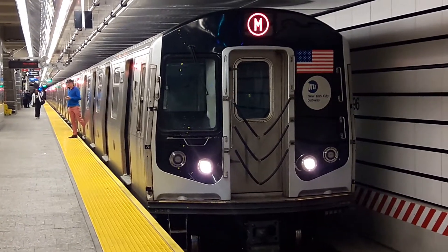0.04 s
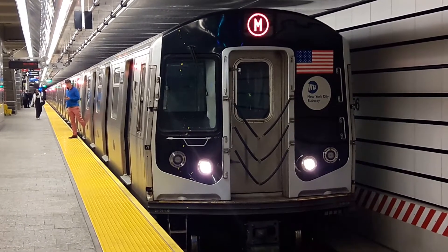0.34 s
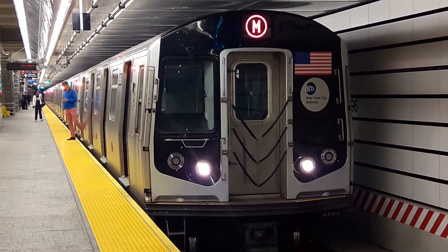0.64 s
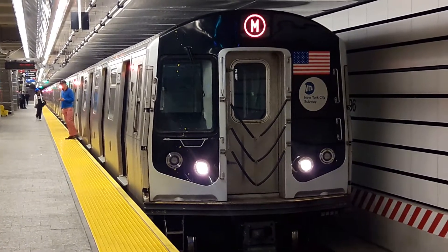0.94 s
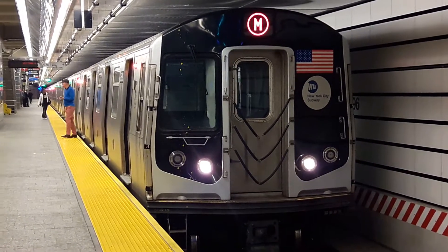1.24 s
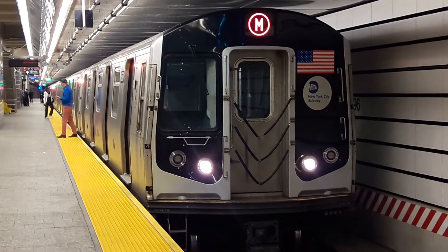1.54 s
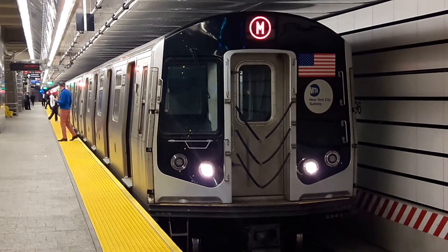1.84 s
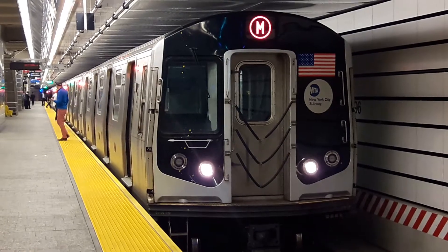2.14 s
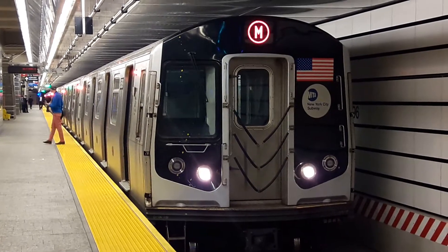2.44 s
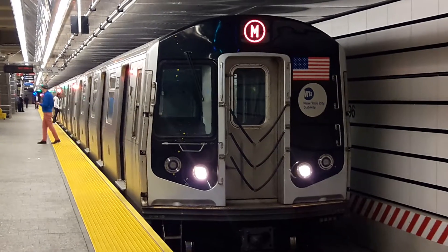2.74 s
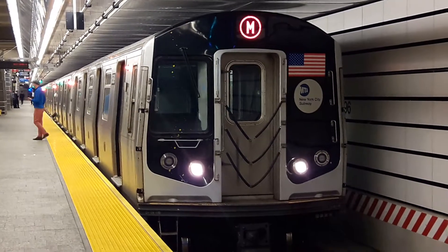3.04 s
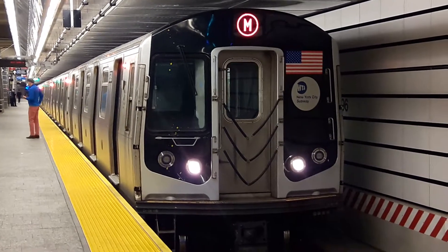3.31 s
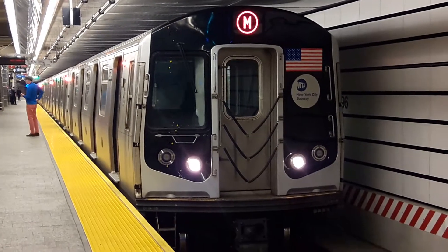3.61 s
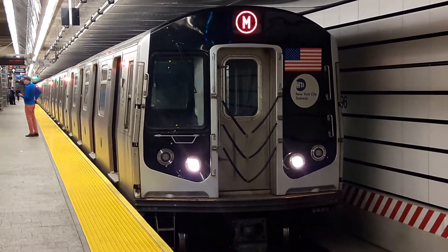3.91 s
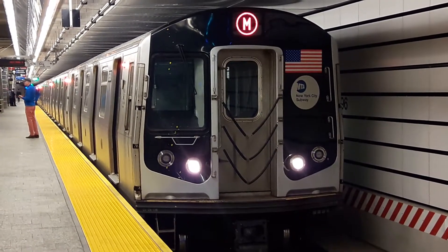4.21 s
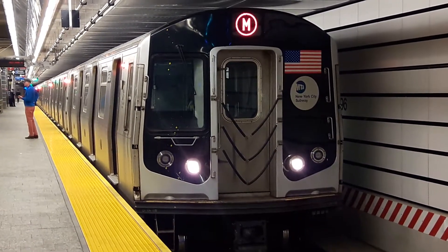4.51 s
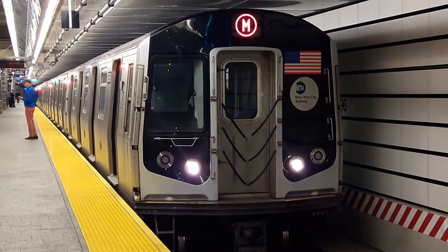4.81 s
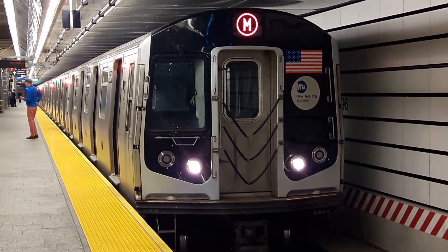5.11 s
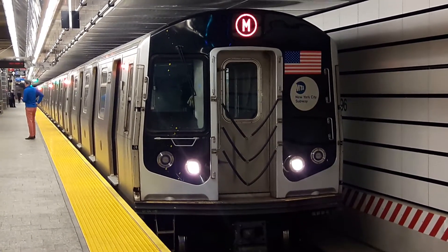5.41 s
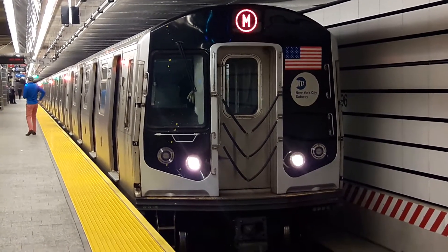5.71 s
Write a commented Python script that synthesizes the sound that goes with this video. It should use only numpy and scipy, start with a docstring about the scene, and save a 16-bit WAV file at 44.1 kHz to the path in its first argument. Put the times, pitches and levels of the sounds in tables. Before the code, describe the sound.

A subway train stands at an underground platform, its electrical equipment humming on one steady low note. The air-conditioning rushes evenly through ducts and tunnel, with faint motor tones mixed in. Right at the start a valve lets off two soft puffs of air, then a weaker one about a second later, each dying away in the station. The hum and rush carry on, heard from just ahead of the cab.

```python
"""Subway train standing at an underground platform.

Heard from just ahead of the cab. The electrical equipment hums on one steady note with a strong
octave, motors add faint tones, and the air-conditioning rushes through ducts and tunnel.
Near the start a valve lets off soft puffs of air that die away in the station."""
import sys
import numpy as np
from scipy import signal
from scipy.fft import rfft, irfft
from scipy.io import wavfile
from scipy.ndimage import uniform_filter1d

SR = 44100
rng = np.random.default_rng(int(sys.argv[2]) if len(sys.argv) > 2 else 0)


def log_audio(samples):
    """Write samples as a 16-bit WAV file to the path given in sys.argv[1]."""
    # one column per channel
    frames = np.atleast_2d(samples).T
    # limit to full scale, then quantise
    limited = np.clip(frames, -1, 1)
    pcm = np.round(limited * 32767).astype(np.int16)
    wavfile.write(sys.argv[1], SR, pcm)


N = 253898
TIME_S = np.arange(N) / SR
FREQ_HZ = np.maximum(np.arange(N // 2 + 1) * SR / N, 1)


def undb(db):
    """Decibels to gain."""
    return 10 ** (np.asarray(db) / 20)


def over_time(rows):
    """Breakpoints interpolated linearly in time."""
    times_s, values = np.transpose(rows)
    return np.interp(TIME_S, times_s, values)


def over_freq(rows, column=1):
    """One column interpolated over log frequency."""
    columns = np.transpose(rows)
    return np.interp(np.log(FREQ_HZ), np.log(columns[0]), columns[column])


def white_spectra(count):
    """Independent noise spectra, unit power per Hz."""
    return rfft(rng.standard_normal((count, N))) * np.sqrt(SR / 2)


def drift(rate_hz):
    """Random steps smoothed twice; zero mean, unit spread."""
    hold = int(SR / rate_hz)
    steps = np.repeat(rng.standard_normal(N // hold + 1), hold)
    smooth = uniform_filter1d(uniform_filter1d(steps, hold), hold)[:N]
    return (smooth - smooth.mean()) / smooth.std()


def tone(pitch_hz, level_db, pan_db, waver_db, waver_rad, lag_ms=0.18):
    """Sine whose level and phase waver as its reflections shift; left ear leads."""
    ear_time_s = TIME_S - np.array([[0], [lag_ms]]) / 1000
    phase = 2 * np.pi * (pitch_hz * ear_time_s + rng.random()) + waver_rad * drift(4.01)
    ear_db = np.array([[pan_db], [-pan_db]]) / 2
    return np.sqrt(2) * np.sin(phase) * undb(level_db + waver_db * drift(5) + ear_db)


# Octave swell: time_s, gain_db
OCTAVE_SWELL = [(0.0, 0.4), (0.34, -1.7), (1.27, -2.3), (2.07, 2.5), (3.1, -1.5), (3.45, 2.5), (4.26, -2.5),
                (4.49, 1.5), (5.75, -1.3)]
# Hum partials: harmonic, level_db, left_minus_right_db
HUM_PARTIALS = [(1, -45.5, -1.3), (2, -29, 1.3), (3, -47, 3.5), (4, -52, 3), (5, -53.5, -10),
                (6, -50.5, 1.5), (9, -53.5, -3)]


def electrical_hum(pitch_hz=113.75, heave_db=1.3, heave_period_s=4.4, heave_crest_s=0.68):
    """Magnetic hum: the fundamental heaves, the octave swells in standing waves, upper partials waver."""
    heave = np.cos(2 * np.pi * (TIME_S - heave_crest_s) / heave_period_s)
    out = 0
    for harmonic, level_db, pan_db in HUM_PARTIALS:
        if harmonic == 1:
            level_db += heave_db * heave
            settings = dict(waver_db=1.3, waver_rad=0.13, lag_ms=0.12)
        elif harmonic == 2:
            level_db += over_time(OCTAVE_SWELL)
            settings = dict(waver_db=0.12, waver_rad=0.075, lag_ms=0.18)
        else:
            settings = dict(waver_db=1.46, waver_rad=0.07 * harmonic, lag_ms=0.098)
        out += tone(harmonic * pitch_hz, level_db, pan_db, **settings)
    return out


# Rush spectrum: freq_hz, density_db_per_hz
RUSH_SPECTRUM = [(25, -93), (52, -80), (80, -78), (110, -62.5), (160, -66), (225, -56.5), (300, -63),
                 (520, -67), (900, -66), (1400, -69.5), (2050, -73), (3000, -81), (6000, -87.5),
                 (15500, -114)]
# Duct and tunnel resonances: centre_hz, width_hz, lift_db
DUCT_RESONANCES = [(224, 21, 4.5), (295, 24, 3.5), (342.6, 7, 5.5), (380, 22, 3), (461.6, 10, 6),
                   (726, 22, 3.5), (812, 28, 2.5), (915, 42, 3.5), (1205, 26, 4.5), (1750, 22, 2),
                   (2000, 54, 0.5), (2500, 54, -1.5)]
# Likeness of the rush at the two ears: freq_hz, correlation
EAR_CORRELATION = [(60, 0.91), (290, 1), (560, 0.49), (880, 0.65), (1300, -0.31), (1650, -0.2),
                   (2000, -0.39), (2600, -0.11), (15000, -0.037)]


def air_conditioning(lag_ms=0.099, flutter_db=0.24):
    """Fan turbulence coloured by ducts and tunnel; bass alike at both ears, treble diffuse."""
    resonance_db = sum(lift_db / (1 + (2 * (FREQ_HZ - centre_hz) / width_hz) ** 2)
                       for centre_hz, width_hz, lift_db in DUCT_RESONANCES)
    colour = undb(over_freq(RUSH_SPECTRUM) + resonance_db)
    correlation = over_freq(EAR_CORRELATION)
    mid, side = white_spectra(2) * np.sqrt([(1 + correlation) / 2, (1 - correlation) / 2])
    # Arrives along the platform, left ear first.
    delay = np.exp(-2j * np.pi * FREQ_HZ * np.array([[0], [lag_ms]]) / 1000)
    rush = irfft(np.array([mid + side, mid - side]) * delay * colour, N)
    return rush * undb(flutter_db * drift(6))


# Motor, fan and inverter tones: pitch_hz, level_db, left_minus_right_db
MOTOR_TONES = [(40.4, -67.5, 0), (57.9, -65, 1), (119.4, -63, 1.5), (355, -51, 6.5), (370, -57, 1.5),
               (381.6, -56.5, 0.5), (4500, -75.5, -3)]


def motors():
    """Faint tones of the auxiliary machines, unrelated to the hum."""
    return sum(tone(pitch_hz, level_db, pan_db, waver_db=2.5, waver_rad=0.31)
               for pitch_hz, level_db, pan_db in MOTOR_TONES)


# Valve puffs: peak_s, gain_db
PUFFS = [(.02, -3), (.155, -2), (1.18, -11)]
# Escaping air spectrum: freq_hz, density_db_per_hz
HISS_SPECTRUM = [(1500, -97), (3500, -83), (5500, -86), (7500, -88.5), (10000, -96), (15000, -109)]


def air_valve(attack_s=0.044, puff_t60_s=0.6, station_db=-4.5, station_t60_s=2.2):
    """A small valve under the car lets off puffs; the station prolongs the hiss."""
    power = 0
    for peak_s, gain_db in PUFFS:
        age_s = TIME_S - peak_s
        rise = np.clip(1 + age_s / attack_s, 0, 1)
        decay_s = np.maximum(age_s, 0)
        direct = undb(-60 * decay_s / puff_t60_s)
        tail = undb(station_db - 60 * decay_s / station_t60_s)
        power += (undb(gain_db) * rise) ** 2 * (direct ** 2 + tail ** 2)
    hiss = irfft(white_spectra(2) * undb(over_freq(HISS_SPECTRUM)), N)
    return hiss * np.sqrt(power)


def scene():
    """All machinery of the standing train, in stereo."""
    return electrical_hum() + air_conditioning() + motors() + air_valve()


# Microphone port response: freq_hz, left_db, right_db
PORT_RESPONSE = [(300, 0.32, -0.26), (700, -0.87, 0.46), (2400, -0.1, 0.46), (3660, 0.3, -1),
                 (4500, -1.8, 5.5), (5600, -4, 7), (6350, -1.6, 1.4), (7400, 4.5, -15.0), (8000, -2.5, -31),
                 (8470, 3.1, -10), (9700, 3, -2), (10700, 3, -11), (11400, -3, -12), (15000, -0.5, -6)]


def microphone_port(sound, channel, half_taps=256):
    """Each port colours the treble in its own way; short symmetric FIR."""
    response = irfft(undb(over_freq(PORT_RESPONSE, column=channel + 1)), N)
    length = 2 * half_taps + 1
    taps = np.roll(response, half_taps)[:length] * signal.windows.hann(length)
    return signal.fftconvolve(sound, taps, "same")


def record(dry, cutoff_hz=15600):
    """Brief edge fades, port colour, steep low-pass."""
    faded = dry * signal.windows.tukey(N, 0.001)
    coloured = [microphone_port(faded[channel], channel) for channel in range(2)]
    lowpass = signal.ellip(10, 0.2, 80, cutoff_hz, fs=SR, output="sos")
    return signal.sosfilt(lowpass, coloured)


dry = scene()
out = record(dry)
log_audio(out)
```